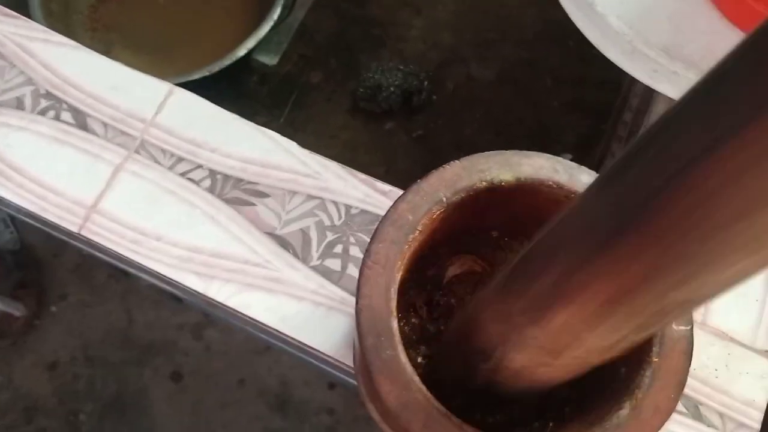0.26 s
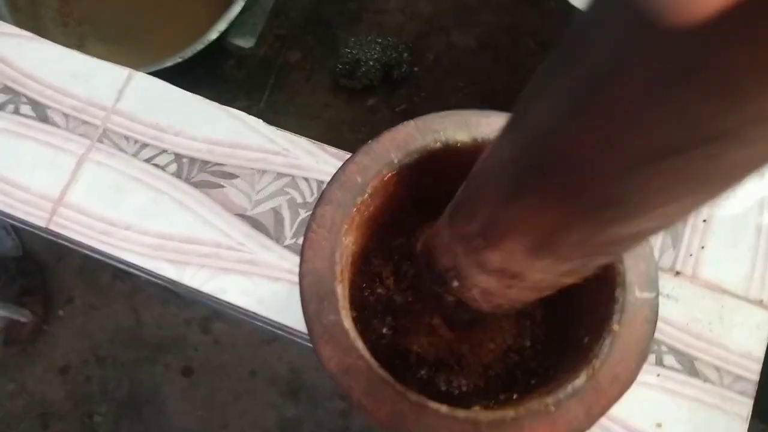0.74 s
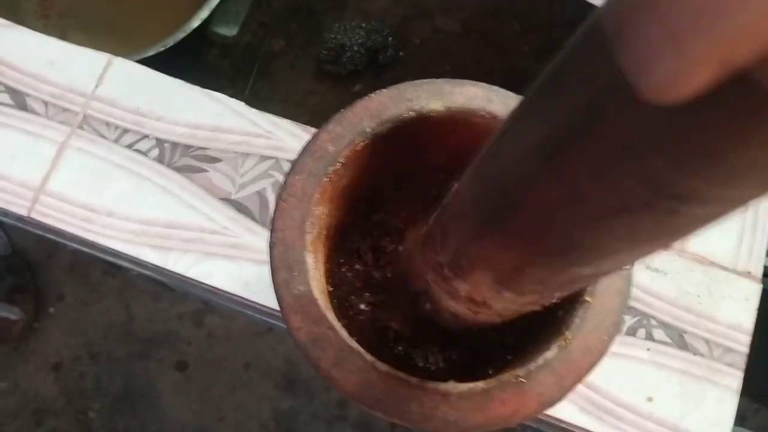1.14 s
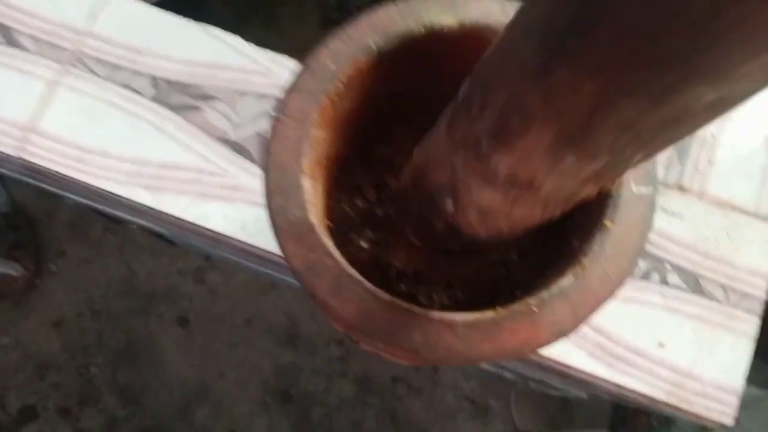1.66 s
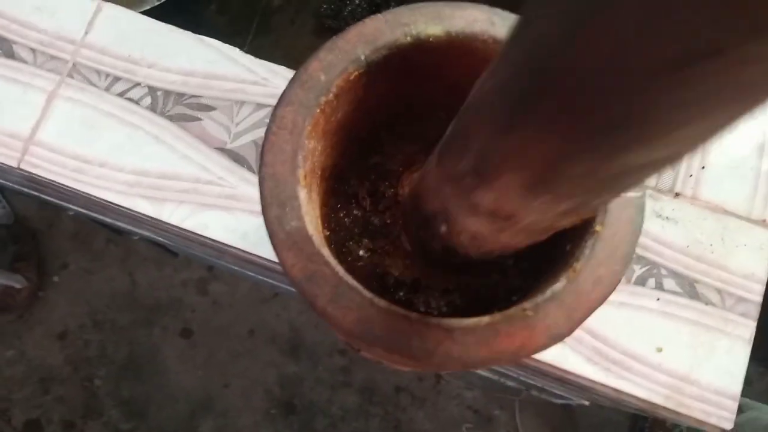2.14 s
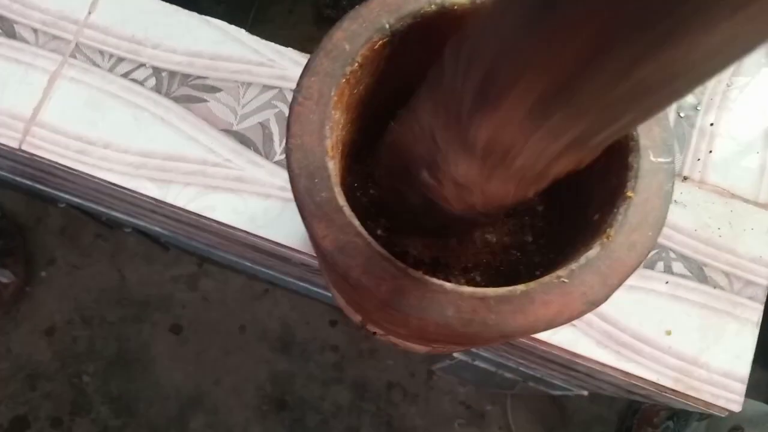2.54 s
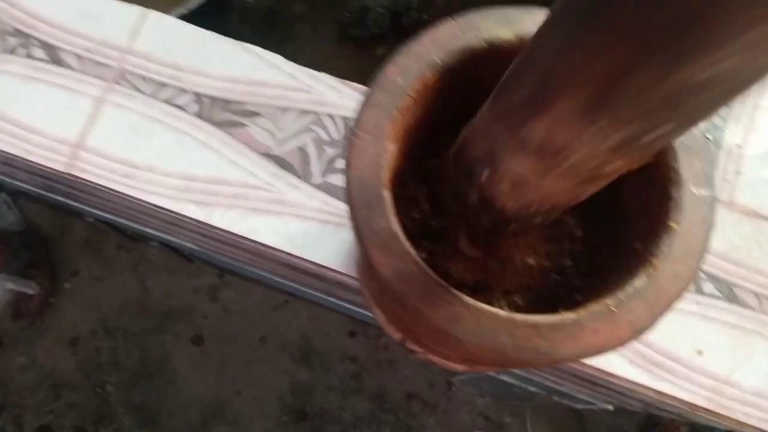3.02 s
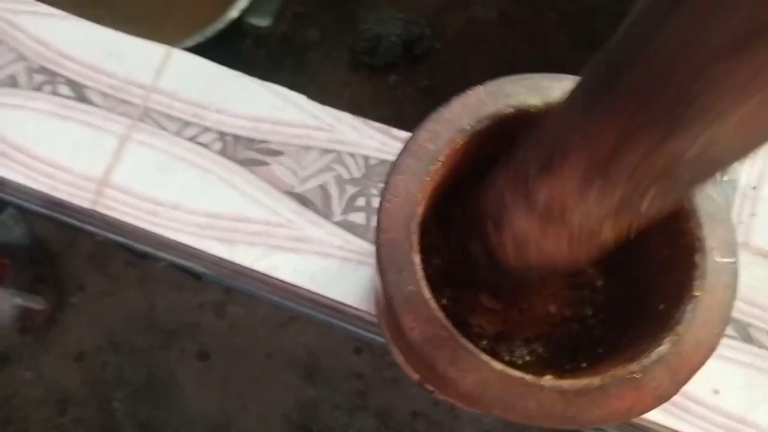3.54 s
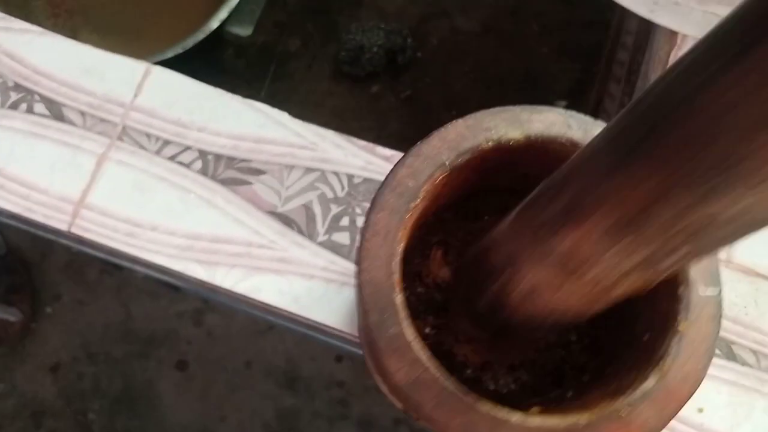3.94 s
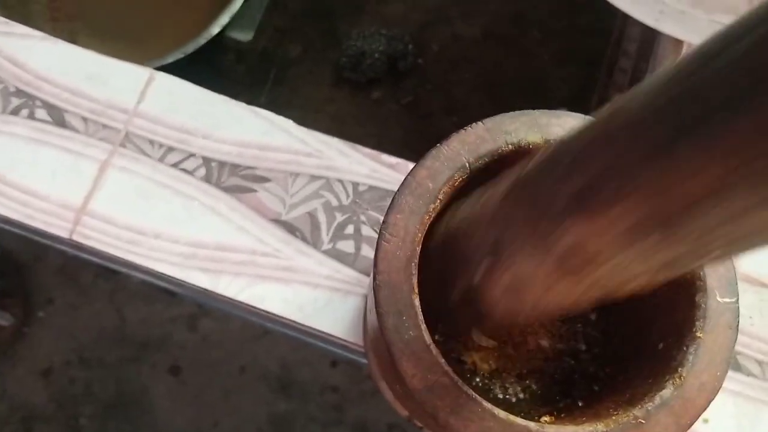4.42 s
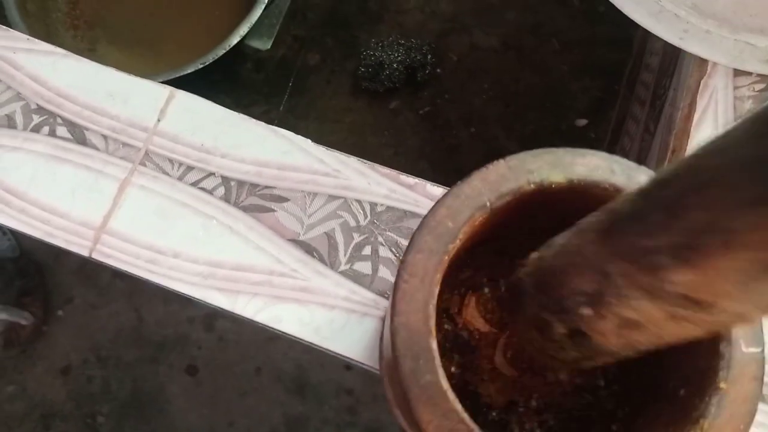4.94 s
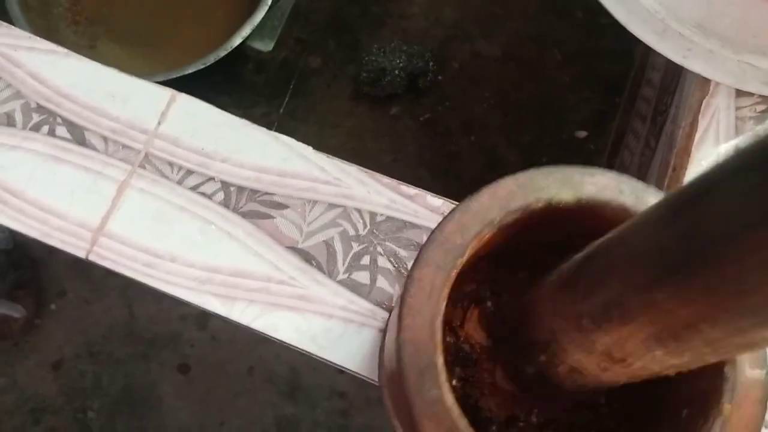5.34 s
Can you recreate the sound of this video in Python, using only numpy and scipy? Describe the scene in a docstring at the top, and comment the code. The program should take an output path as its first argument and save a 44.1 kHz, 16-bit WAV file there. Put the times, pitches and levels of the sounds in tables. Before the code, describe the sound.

Close, steady pounding of wood in a wooden bowl: a double touch opens it, then regular hollow knocks with low boom, another double before the middle, the hardest blow near the end, a softer double and a final knock. Seeds snap faintly. The hard-walled kitchen echoes for up to a second over a very faint rush. The small microphone softens the treble and levels the loud knocks.

```python
"""A heavy wooden pestle pounds moist garlic and spices in a wooden mortar on a kitchen bench.
The pounding is already under way at the start, where a stroke touches twice, then runs at about three strokes a second.
Strokes touch twice again at about 2.3 s and, just after the hardest blow, at 5.1 s; the last blow falls at 5.4 s.
Each blow is noise that sets the wood ringing; decaying noise and low tones make the boom of bench and hard, bare room.
Seeds snap as tiny noise bursts over a faint rush; a limiter ducks at each knock, so echoes swell between strokes."""
import sys
import numpy as np
from scipy import signal
from scipy.fft import rfft, irfft, next_fast_len
from scipy.io import wavfile
from scipy.ndimage import uniform_filter1d, minimum_filter1d

SR = 44100
rng = np.random.default_rng(int(sys.argv[2]) if len(sys.argv) > 2 else 0)


def dump(signal):
    """Clip the signal to [-1, 1] and save it as 16-bit WAV at the path in sys.argv[1]."""
    limited = np.clip(np.atleast_2d(signal).T, -1, 1)
    pcm = np.round(limited * 32767).astype(np.int16)
    wavfile.write(sys.argv[1], SR, pcm)


N = 245637

# The faint rush of the kitchen. Each row: frequency in Hz, level in dB per Hz.
RUSH_SPECTRUM = [(20, -19), (80, -14), (300, 24), (900, 46), (2500, -57), (6000, -50), (16000, -45)]
# How long echoes last. Each row: frequency in Hz, time to fall by 60 dB in seconds.
ECHO_DECAY = [(80, 1.0), (250, 0.91), (800, 1), (1500, 0.97), (3500, 0.88), (6300, 0.66), (9000, 0.48),
              (15000, 0.29)]
# How strongly the room echoes. Each row: frequency in Hz, level in dB.
ECHO_SPECTRUM = [(60, -34), (200, -2), (450, -25.5), (650, 8), (900, 2), (1100, 6), (1240, 9), (1380, -6.5),
                 (1560, -6.5), (2000, 0.5), (2750, 6), (3400, -1.5), (4500, 1), (9000, 2.5)]
# Seeds that crack under the pestle. Each row: start in seconds, level of the first snap in dB, number of snaps.
SEEDS = [(0.047, -30, 1), (0.0707, -30, 1), (1.782, -48, 1), (1.833, -27, 1), (2.123, -37, 1),
         (2.959, -37, 2), (4.1156, -37.5, 1), (4.464, -36, 1), (5.149, -27, 3), (5.3071, -39, 2)]
# The colour of one snap. Each row: frequency in Hz, level in dB per Hz.
SNAP_SPECTRUM = [(500, -1), (1600, -5), (2700, -2), (3600, 5.5), (6300, 2), (9000, -9), (16000, -29)]
# The colour of the boom through the bench. Each row: frequency in Hz, level in dB per Hz.
BOOM_SPECTRUM = [(20, -36), (45, -19), (75, -11.5), (150, -5), (225, 0), (270, 3), (350, 3), (540, 1.5),
                 (640, -6), (800, -6.5), (1100, -26), (2000, -77)]
# Standing waves of the kitchen. Each row: frequency in Hz, typical level in dB.
STANDING_WAVES = [(91, -25), (124, -27.5), (190, -18), (260, -12), (294, -14), (405, -17.5), (450, -20),
                  (499, -20), (577, -18.5), (701, -20.5)]
# Pestle blows. Each row: time in seconds, force in dB, place from 0 (floor) to 1 (wall),
# bareness from 0 (thick paste) to 1 (bare wood), slant of the pestle from 0 to 1, extra ring of the wall in dB.
STROKES = [(-0.09, -1, 0.58, .26, 0.82, -5), (0.0382, -9, .02, 0.07, .19, -5),
           (0.0611, -3, 0.87, 0.052, 0.61, -3), (0.37, 1, 0.4, 0.32, 0.99, -4),
           (0.676, 4, 0.53, 0.66, .38, 0.5), (0.9472, 1.5, 0.68, 1.0, 0.95, -0.5),
           (1.236, 3, 0.5, 0.22, 0.45, 0), (1.5339, 2, 0.33, 0.063, 0.72, 9),
           (1.8113, 1.5, 0.96, 0.28, 0.4, 0.5), (2.0922, 2.5, 0.098, 0.51, 0.9, 3),
           (2.3336, -10.5, 0.038, 0.34, 0.54, 6), (2.3719, 2, 1, 0.54, 0.74, -1.5),
           (2.6728, 4.5, 0.38, 0.37, .87, 1.5), (2.9478, -0.5, 0.73, 0.046, 0.54, 1.5),
           (3.2519, 2.5, 0.79, .4, 0.92, -0.5), (3.578, 3, 0.18, 0.73, 0.2, 2),
           (3.9787, 1.3, 0.15, 0.19, .7, -2), (4.2644, 3.5, 0.51, 0.62, 0.14, 0),
           (4.5538, 3.5, 0.21, 0.4, 0.32, -2), (4.8483, 6.5, 0.39, 0.43, 0.79, -3.5),
           (5.1141, -6.5, 0.2, 0.31, .25, -2), (5.1438, -5, 0.69, 0.28, 0.85, -4.5),
           (5.4183, 0, 0.34, 0.51, 0.93, -3)]
# Modes, the ringing tones of mortar and pestle, before each blow shifts them a little.
# Each row: frequency in Hz, level in dB, time to fall by 60 dB in seconds.
WOOD_MODES = [(132, -5, 0.0068), (266, 3, 0.015), (466, -2, 0.043), (650, -15.5, 0.026),
              (856.4, -3.5, 0.025), (1080, -25, 0.0011), (1344, -13, 0.0094), (1529, -7, 0.018),
              (1923, -3.5, 0.019), (3381, -3, 0.018), (3677, -6.5, 0.015), (4435, -6.5, 0.0097),
              (5610, -3, 0.0021), (6194, -4, 0.0038)]
# The frequencies in Hz that divide the modes into seven families, low to high.
FAMILY_BORDERS = [600, 1050, 1800, 2700, 4000, 5000]
# How each family answers a blow. Each row: dB for an upright blow on the padded floor,
# dB more at the wall, dB more on bare wood, dB more at full slant. The rows are, in order:
# thud, hollow knock of the floor, clack of wood on wood, note of a slanting blow,
# ring of the wall, high ring of the wall, crack.
FAMILY_LEVELS = [(-18.5, -9, -17, -7), (-24, -14, 16, -1.5), (-29.5, -4, 21, 1), (-44, -3.5, -4.5, 20.5),
                 (-41, 13, 2.5, 6.5), (-44, 25.5, 4, -6), (-28, 3.5, 4, -4.5)]
# How the small microphone colours the sound. Each row: frequency in Hz, level in dB.
MICROPHONE_RESPONSE = [(20, -16), (70, -5.5), (6600, -5.5), (7200, -8), (8200, -16), (10000, -21),
                       (13600, -29), (14900, -17.5), (15400, -16), (16000, -13)]

LEAD = SR // 4  # samples of pounding before time zero, cut off at the end
TOP_HZ = 15900  # nothing is kept from here up
RING_FAMILY = 4  # the ring of the wall, counting from 0
NOTE_LOW_HZ, NOTE_HIGH_HZ, NOTE_WALL_RISE = 1800, 2700, 0.16  # the note sharpens by this share at the wall
BOOM_DB, BOOM_WALL_DB = -6.5, -9.5  # a blow up the wall sends less of the jolt down into the bench
GRIT_DB, GRIT_WALL_DB = -28, 0.5  # grit crushed by a blow, a little more against the wall
# Contact time in seconds before it changes with each dB of force and with bareness, both in dB.
CONTACT_S, CONTACT_FORCE_DB, CONTACT_BARE_DB = 0.0059, -0.73, -15
SNAP_GAP_S, SNAP_LOSS_DB = 0.0091, 4  # from one snap of a seed to the next
STRAY_DB, STRAY_WITHIN_S = -39, 0.15  # after each blow one more small bit gives way


def amp(db):
    """Turns decibels into a plain gain."""
    return 10 ** (np.asarray(db) / 20)


def norm(x):
    """Scales x to an energy of one."""
    return x / np.sqrt(np.sum(x ** 2) + 1e-20)


def burst(x):
    """Scales x to the energy of 10 ms at an rms of one."""
    return norm(x) * np.sqrt(SR / 100)


def along(points, hz):
    """Reads a table of frequencies and values between its rows, on a log frequency axis."""
    f, v = np.transpose(points)
    return np.interp(np.log(hz + 1), np.log(f + 1), v)


def filtered(x, gain_at):
    """Multiplies each frequency of x by the gain that gain_at gives for it."""
    size = next_fast_len(len(x) + 4096)
    hz = np.fft.rfftfreq(size, 1 / SR)
    return irfft(rfft(x, size) * gain_at(hz), size)[:len(x)]


def coloured(x, spectrum):
    """Shapes x with a table of levels in dB."""
    return filtered(x, lambda hz: amp(along(spectrum, hz)))


def causal(x, spectrum):
    """Shapes x with a table of levels in dB, so that any ringing comes only after its cause."""
    size = 4096
    hz = np.fft.rfftfreq(size, 1 / SR)
    cepstrum = irfft(np.log(amp(along(spectrum, hz))))
    cepstrum[1:size // 2] *= 2  # folding the late half onto the early half gives minimum phase
    cepstrum[size // 2 + 1:] = 0
    impulse = irfft(np.exp(rfft(cepstrum)))
    return signal.fftconvolve(x, impulse)[:len(x)]


def add(track, s, x):
    """Mixes x into a track at s seconds."""
    part = track[max(LEAD + round(s * SR), 0):][:len(x)]
    part += x[:len(part)]


def ambience():
    """The faint steady rush of the kitchen: noise with a fixed colour."""
    noise = coloured(rng.standard_normal(N), RUSH_SPECTRUM)
    return amp(-46.5) * noise / noise.std()


def swell(t, first, build):
    """Reflections thicken over the build time in seconds, starting from a first share."""
    return first + (1 - first) * (1 - np.exp(-(t / build) ** 2))


def reverberation(spectrum, first, build):
    """One second of diffuse echoes: noise in which each frequency dies at its own speed."""
    hz, t, noise = signal.stft(rng.standard_normal(SR), SR, nperseg=256)
    decay = amp(-60 * t / along(ECHO_DECAY, hz)[:, None])
    tail = signal.istft(noise * decay, SR, nperseg=256)[1][:SR]
    thickening = swell(np.arange(SR) / SR, first, build)
    return coloured(norm(tail * thickening), spectrum)


def shifted(walls, fresh, change):
    """The echo pattern changes in part as the pestle and the microphone move."""
    return np.sqrt(1 - change) * walls + np.sqrt(change) * fresh


def snap_times():
    """Time and level of every snap: seeds break in short runs, small bits at random after the blows."""
    snaps = []
    for s, db, count in SEEDS:
        for k in range(round(count)):
            snaps.append((s + k * SNAP_GAP_S, db - k * SNAP_LOSS_DB))
    for s, *_ in STROKES:
        snaps.append((s + STRAY_WITHIN_S * rng.random(), STRAY_DB + rng.normal(0, 2)))
    return snaps


def spices():
    """Seeds snap under the pestle as short fading noise, and the room answers faintly."""
    snaps = np.zeros(LEAD + N)
    t = np.arange(SR // 50) / SR
    fade = amp(-60 * t / 0.021)
    for s, db in snap_times():
        snap = causal(rng.standard_normal(len(t)) * fade, SNAP_SPECTRUM)
        add(snaps, s, amp(db) * burst(snap))
    echoes = reverberation(ECHO_SPECTRUM, first=1.0, build=0.033)
    return snaps + amp(-7.5) * signal.fftconvolve(snaps, echoes)[:len(snaps)]


def bench():
    """Each jolt goes through the bench and sets the low standing waves of the room going."""
    boom = np.zeros(LEAD + N)
    t = np.arange(SR) / SR
    echoes = lambda: reverberation(BOOM_SPECTRUM, first=0.4, build=0.045)
    walls = echoes()
    for s, force_db, wall, *_ in STROKES:
        sound = amp(-3.5) * norm(shifted(walls, echoes(), change=0.35))
        for hz, db in STANDING_WAVES:
            tone = np.sin(2 * np.pi * (hz * t + rng.random()))
            wave = tone * amp(-60 * t / along(ECHO_DECAY, hz))
            sound += amp(db + rng.normal(0, 0.99)) * norm(wave * swell(t, first=0.67, build=0.02))
        add(boom, s, amp(BOOM_DB + force_db + BOOM_WALL_DB * wall) * burst(sound))
    return boom


def landing_levels(force_db, wall, bare, slant, ring_db):
    """How a blow lands decides the level in dB of each family of modes."""
    landing = [1, *np.clip([wall, bare, slant], 0, 1)]
    levels_db = force_db + np.array(FAMILY_LEVELS) @ landing
    levels_db[RING_FAMILY] += ring_db
    return levels_db


def struck_modes(levels_db, wall):
    """The pestle loads the bowl a little differently each blow, and the note sharpens up the wall."""
    modes = []
    for hz, db, t60 in WOOD_MODES:
        pitch = 1 + 0.008 * rng.standard_normal()
        if NOTE_LOW_HZ < hz < NOTE_HIGH_HZ:
            pitch += NOTE_WALL_RISE * wall ** 3
        family = np.searchsorted(FAMILY_BORDERS, hz)
        modes.append((hz * pitch, amp(db + levels_db[family]), t60))
    return modes


def knock(modes, grit, contact_time):
    """A gritty contact, at its height 4.5 ms in, sets the modes ringing; paste makes it longer."""
    t = np.arange(SR // 20) / SR
    since = t - 0.0045
    bite = np.exp(-(since / 0.0007) ** 2)
    yielding = np.exp(-np.abs(since) / np.clip(contact_time, 0.0004, 0.0026))
    contact = np.where(since < 0, bite, yielding)  # the pestle bites at once, then the paste gives way
    crush = lambda: contact * rng.standard_normal(len(t))
    # the finest grit breaks at the height of the blow
    sound = grit * burst(np.diff(contact * crush(), prepend=0))
    for hz, gain, t60 in modes:
        ringing = np.sin(2 * np.pi * hz * t) * amp(-60 * t / t60)
        sound += gain * burst(signal.fftconvolve(crush(), ringing)[:len(t)])
    return sound


def radiated(modes, grit, hz):
    """What the room receives: the power of one blow summed over all directions, as a gain."""
    power = (grit * norm(hz)) ** 2
    for centre, gain, t60 in modes:
        width = np.log(1000) / (np.pi * t60)  # a mode that dies sooner spreads over more frequencies
        resonance = norm(1 / (1 + ((hz - centre) / width) ** 2))
        power = power + (gain * resonance) ** 2
    return np.sqrt(power * len(hz) * SR / 100)


def pestle():
    """The pestle sets the wood ringing at each knock, and the kitchen echoes the same tones."""
    near, far = np.zeros((2, LEAD + N))
    echoes = lambda: reverberation(ECHO_SPECTRUM, first=0.88, build=0.06)
    walls = echoes()
    for s, force_db, wall, bare, slant, ring_db in STROKES:
        modes = struck_modes(landing_levels(force_db, wall, bare, slant, ring_db), wall)
        grit = amp(GRIT_DB + force_db + GRIT_WALL_DB * wall)
        contact_time = CONTACT_S * amp(CONTACT_FORCE_DB * force_db + CONTACT_BARE_DB * bare)
        add(near, s - 0.005, knock(modes, grit, contact_time))
        pattern = shifted(walls, echoes(), change=0.68)
        answer = filtered(pattern, lambda hz: radiated(modes, grit, hz))
        add(far, s + 0.002, answer)
    # so small a body radiates little deep bass
    near = filtered(near, lambda hz: 1j * hz / (1j * hz + 110))
    return amp(7.5) * near + amp(2) * far


def scene():
    """All the sounds add up at one microphone."""
    pounding = pestle() + bench() + spices()
    return (pounding[LEAD:] + ambience())[None]


def limiter(x, threshold_db, slope, ahead, hold, recovery_db):
    """Turns down just before each loud peak, holds, then recovers by recovery_db a second."""
    power = uniform_filter1d(x ** 2, SR // 200)  # averaged over 5 ms
    level_db = 10 * np.log10(np.abs(power) + 1e-12)
    cut_db = slope * np.maximum(level_db - threshold_db, 0)
    early, late = int(ahead * SR), int(hold * SR)
    span = early + late + 1
    # the deepest cut reaches ahead of the peak and lasts through the hold
    cut_db = -minimum_filter1d(-cut_db, span, origin=late - span // 2)
    ramp = recovery_db * np.arange(len(x)) / SR
    cut_db = np.maximum.accumulate(cut_db + ramp) - ramp
    return x * amp(-uniform_filter1d(cut_db, 2 * early + 1))


def record(dry):
    """A small microphone, dull above 7 kHz with a lift from about 15 kHz, then limiter and band limit."""
    heard = causal(dry[0], MICROPHONE_RESPONSE)
    held = limiter(heard, threshold_db=-21.5, slope=0.48, ahead=0.015, hold=0.038, recovery_db=158)
    return filtered(held, lambda hz: hz < TOP_HZ)[None]


dry = scene()
out = record(dry)
dump(out)
```